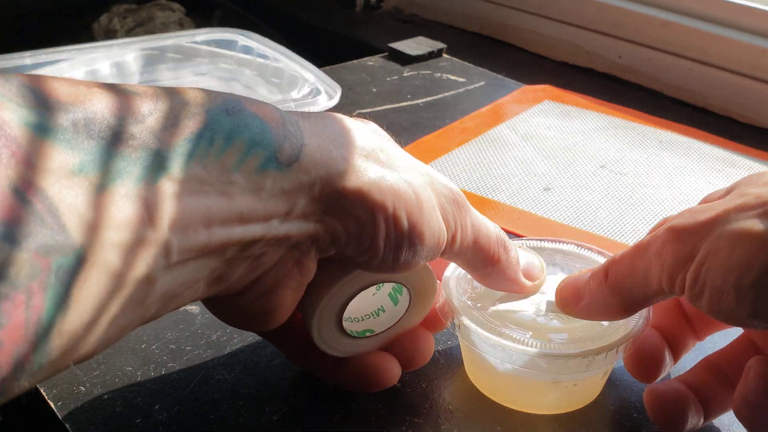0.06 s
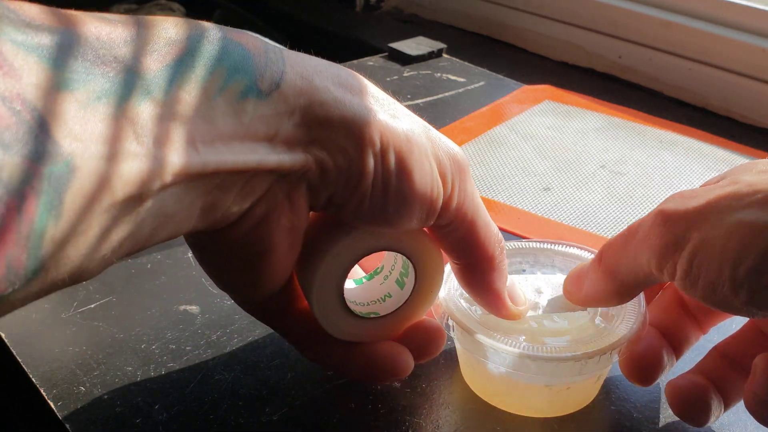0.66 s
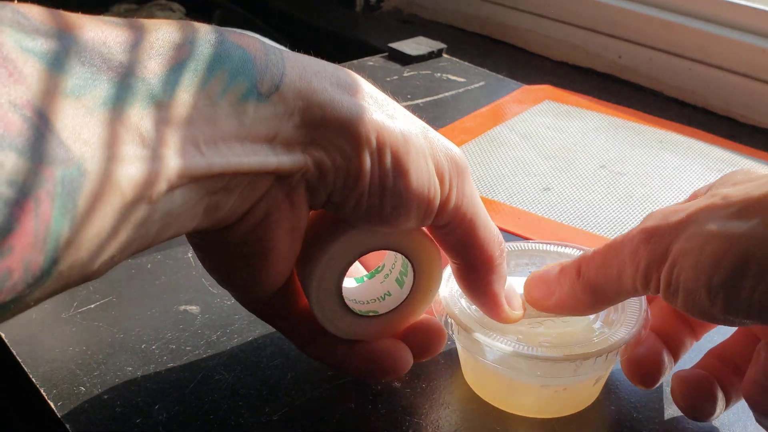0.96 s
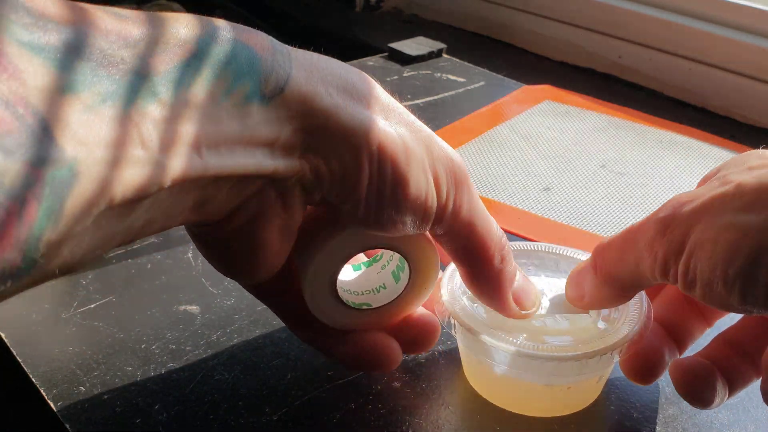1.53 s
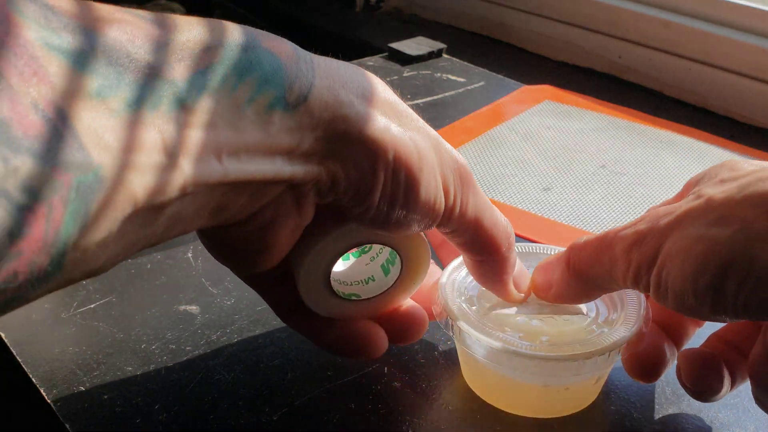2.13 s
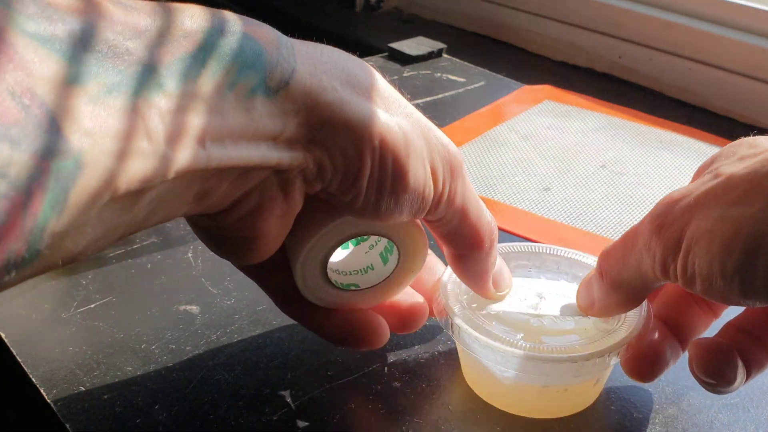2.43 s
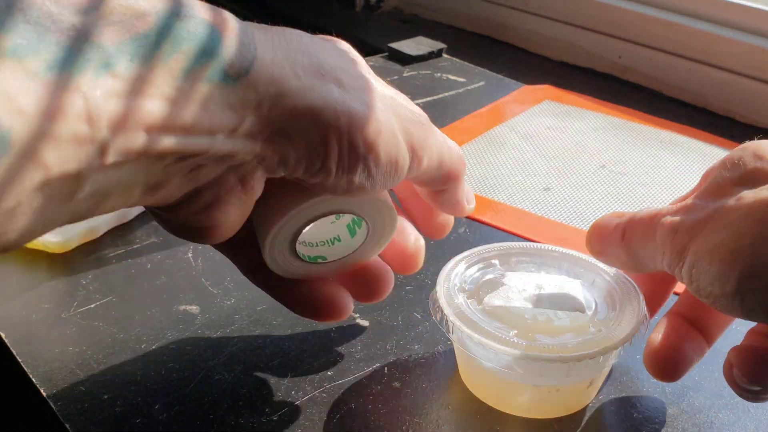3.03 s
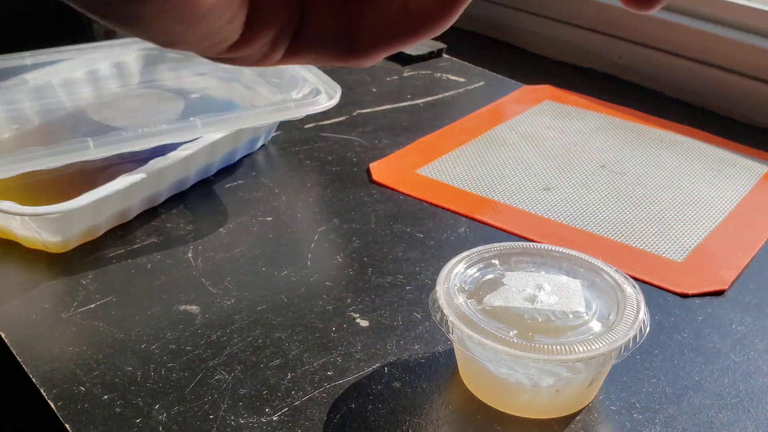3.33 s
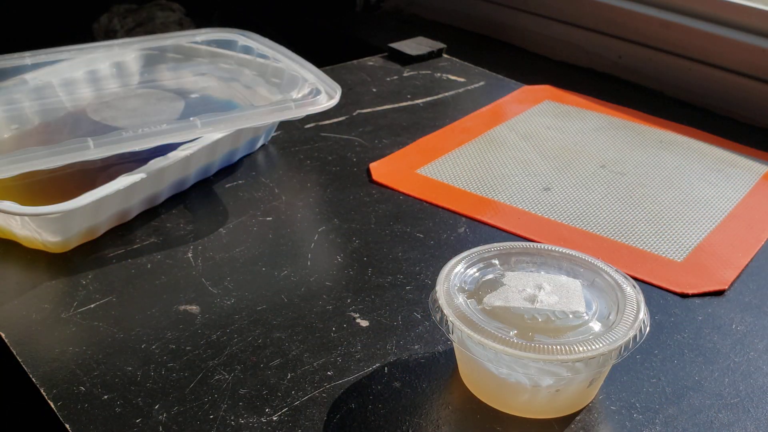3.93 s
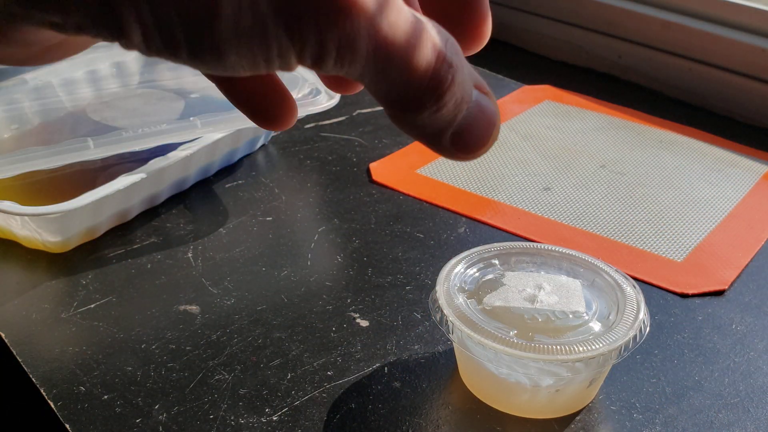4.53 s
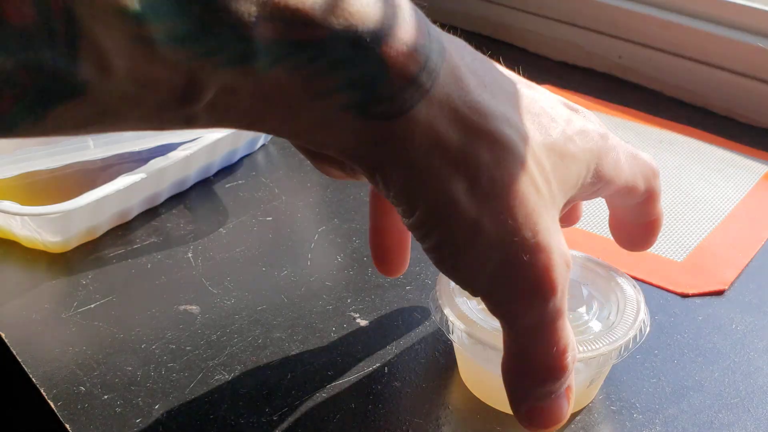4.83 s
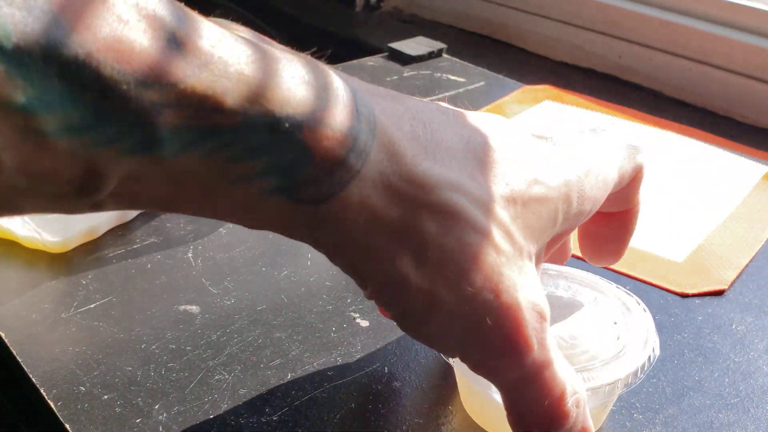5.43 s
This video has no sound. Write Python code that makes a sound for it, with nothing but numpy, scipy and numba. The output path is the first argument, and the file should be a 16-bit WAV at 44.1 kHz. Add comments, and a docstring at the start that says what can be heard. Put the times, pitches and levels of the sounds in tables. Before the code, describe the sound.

Fingers rub tape onto a thin plastic cup lid, which rings softly and buckles with a few sharp snaps, over a faint hum.

```python
"""Taping a cup's lid

Two fingers rub paper tape down onto the thin plastic lid of a small cup, close by in a small room.
The rubbing makes the lid ring. It buckles with sharp snaps and pops back twice when it is let go.
The hands draw back with a soft swish. After a dull knock one takes the cup, which ticks and creaks.
Mains hum and a faint hiss lie under it all."""
import sys
import numpy as np
from scipy import signal
from scipy.fft import rfft, irfft, next_fast_len
from scipy.io import wavfile
from scipy.ndimage import uniform_filter1d, minimum_filter1d
from numba import njit

SR = 44100
rng = np.random.default_rng(int(sys.argv[2]) if len(sys.argv) > 2 else 0)


def persist_wave(psi):
    """Save psi, clipped to +-1, as 16-bit WAV."""
    counts = np.round(np.clip(psi, -1, 1) * 32767).astype(np.int16)
    wavfile.write(sys.argv[1], SR, np.atleast_2d(counts).T)


N = 245637
TIME = np.arange(N) / SR
DOME_LEFT_DB = 6   # the dome is the lid's middle; "left dB" is how much louder the left side is
HANDS_OFF_S = 3.05   # the fingers leave the lid

# How loud the mains hum is over time: time_s, low_note_db, octave_db
HUM_LEVELS = [(0.0, -55.5, -53.5), (1.09, -56, -54), (1.39, -62, -57), (1.84, -61, -60), (2.45, -61, -59.5),
              (5.04, -63, -64), (5.57, -57.5, -58)]
# Finger strokes on the tape, later on the bare cup:
# start_s, length_s, drone_db, hiss_db, extra_rasp_db, dome_pitch_hz
STROKES = [(0.0, 0.064, -45, -47, 0, 1110), (0.073, 0.25, -49.5, -57, -6, 1115),
           (0.15, .14, -46, -49, 1, 1130), (0.271, 0.15, -53, -56.5, 0, 1100),
           (0.389, 0.06, -49, -58.5, -2, 1050), (0.492, .11, -47, -52, -2, 1130),
           (0.698, 0.062, -57, -62, -4.5, 1080), (0.766, 0.055, -49, -58.5, 0, 1150),
           (0.915, 0.2, -47.5, -61.5, -6, 1170), (1.045, 0.091, -38.5, -45.5, 0, 1140),
           (1.115, 0.13, -41.5, -50, 0.5, 1130), (1.211, 0.15, -48.5, -55.5, 0.5, 950),
           (1.429, 0.041, -54, -52, 0, 930), (1.449, 0.16, -56.5, -60.5, -1, 1050),
           (1.605, 0.092, -46.5, -53, 0.5, 1000), (1.716, 0.092, -55.5, -76, -11, 1090),
           (1.801, .11, -51, -57.5, -4.5, 1160), (1.9, 0.082, -61, -69.5, -6, 1100),
           (1.995, 0.029, -53, -62, -5, 1050), (2.072, 0.082, -47.5, -53, -1, 1140),
           (2.138, 0.066, -47.5, -60, -4, 1120), (2.196, 0.075, -43, -51.5, -3.5, 940),
           (2.291, 0.22, -50, -59.5, 0, 930), (2.527, 0.17, -55, -60.5, 1.5, 1030),
           (2.694, .05, -52.5, -69, -3, 1050), (2.736, 0.039, -43, -52, 0, 1000),
           (2.812, 0.076, -48, -55.5, 0, 1100), (2.881, .075, -42, -50.5, 0, 1040),
           (2.961, 0.053, -61, -86, -4, 1080), (5.082, .065, -69.5, -67.5, -3, 938),
           (5.151, 0.071, -73.5, -69.5, -2.5, 918), (5.319, 0.067, -68.5, -78, -4, 950),
           (5.402, 0.078, -68, -65.5, -5, 915), (5.503, 0.05, -54, -65, -2, 925)]
# A finger catches and the plastic ticks: start_s, level_db, sharpness_db
FINGER_CATCHES = [(0.695, -53.5, 6), (.750, -46.5, -13), (0.924, -45.5, -8), (1.606, -40, -17),
                  (2.062, -54, 7), (2.32, -44, -19), (5.108, -55.5, -2), (5.324, -58, 0.5),
                  (5.4532, -47, 10), (5.493, -54.5, 8), (5.531, -48.5, 12)]
# The lid buckles (the last three columns are added to level_db):
# start_s, level_db, dome_pitch_hz, ring_s, upper_notes_db, crack_db, snick_db
LID_SNAPS = [(1.1616, -16, 1213, 0.0022, -13.5, -25, -36), (1.3276, -1, 833, .0021, -2, 1.5, -43.5),
             (1.3400, -36, 880, 0.0022, 4.5, 1, -25.5), (1.3580, -37, 745, 0.0011, -2.5, 2, -22),
             (1.3650, -35, 755, 0.0059, -4, 2.5, -27.5), (1.7134, -10, 1087, 0.0026, -13.5, -16, -54),
             (2.9428, -23.5, 1070, 0.0031, -11, -17.5, -36.5),
             (3.0573, 4, 1063, 0.0025, -15.5, -13.5, -36.5), (3.0747, -3, 916, 0.0034, -19.5, -20.5, -31.5)]
# Dull knocks on the counter, first under the loud snaps, later on their own: start_s, thud_db, tick_db
KNOCKS = [(1.3285, -33, -69.5), (1.714, -49, -75), (3.076, -39, -70), (3.679, -85.5, -53.5),
          (4.361, -66.5, -56.5), (4.375, -76, -62), (4.42, -58, -70), (4.47, -47, -73),
          (4.4974, -44.5, -80)]

# The notes the plastic rings at (a fade is the time to fall 60 dB): pitch_hz, level_db, fade_s, left_db
LID_NOTES = [(1370, -1, 0.01034, 6), (1609, -2, 0.013, 12), (1884, -4.5, .012, 18.5),
             (2580, -13, 0.01537, 17.5), (2720, -3.5, .012, 5), (3135, -9.5, 0.01, 16.5),
             (3990, -8, 0.0082, 3), (5000, -18, .008, -0.5), (5317, -22.5, 0.015, -9)]   # the lid, above the dome's own note
CUP_NOTES = [(290, -5, 0.039, 6), (850, -2, 0.063, -9), (975, -5, .03, 1.5), (2870, -19, 0.024, 7),
             (4000, -1, 0.027, -5), (5630, 0, .02, -6), (6240, 0, 0.033, -18)]   # the cup's wall
# How the lid's sound leans to the left, low to high: pitch_hz, left_db
LID_BALANCE = [(150, -2), (400, 6.5), (800, 6.5), (1300, -2), (2200, 19), (3200, 5), (4400, 2.5),
               (6000, -6), (8000, 1.5), (11000, 8.5), (15000, 9)]

# Tone colours, or how strong each sound is from low to high: pitch_hz, level_db
WHIR_COLOUR = [(70, -8.5), (130, 3.5), (230, -6.5), (330, -2), (430, -8), (600, -25), (1000, -42.5)]   # low whir that swells with the hum
LEFT_HISS_COLOUR = [(25, -102), (45, -91), (90, -87.5), (200, -99.5), (350, -101), (550, -113),
                    (1000, -115), (1450, -111), (2000, -95), (2500, -94.5), (3000, -106), (3700, -124),
                    (8500, -134), (14000, -124)]   # left microphone's hiss
RIGHT_HISS_COLOUR = [(25, -105), (45, -96), (90, -89.5), (200, -95.5), (350, -108), (600, -120),
                     (2000, -125), (6000, -128), (8500, -135), (14000, -127)]   # right microphone's hiss
PAPER_COLOUR = [(150, -2), (330, -2.5), (500, -2.5), (900, -8), (1500, -4), (2200, -1), (3050, 3.5),
                (3900, -2.5), (5200, 1.5), (6300, 0.5), (7300, -9), (8500, -18.5), (15500, -32)]   # skin sliding on tape
RASP_COLOUR = [(3000, -37), (7000, -18), (8300, -14), (10300, 4), (15500, -1)]   # the high edge of that sliding
CRACK_COLOUR = [(150, -19), (400, -8), (700, 3), (1400, 0), (2200, -6.5), (2900, 1.5), (3500, -0.5),
                (4200, -1), (6100, 0.5), (7200, -13), (8500, -18), (11000, -22.5), (15500, -22)]   # plastic creasing
SNICK_COLOUR = [(3000, -20.5), (6000, 2), (8000, -4), (11000, 2), (15500, -1)]   # the thin sheet's high click
THUD_COLOUR = [(60, -1), (160, 9), (260, 4), (430, 5.5), (650, -1.5), (1100, -7.5), (2000, -18),
               (4000, -58.5)]   # dull part of a knock
TICK_COLOUR = [(500, -25.5), (1500, -2.5), (2800, 0.5), (4500, 2.5), (6300, -8.5), (8000, -27),
               (15000, -22.5)]   # bright part of a knock
SKIN_COLOUR = [(2500, -20), (4200, -3), (5200, 3.5), (6300, -4), (8000, -19.5), (10500, -9), (13000, -3),
               (15500, -0.5)]   # hands brushing
ECHO_COLOUR = [(100, -8.5), (300, 13.5), (550, 3.5), (1000, -6), (2000, -3.5), (5000, 3), (8000, -6),
               (15000, 0)]   # the room's echo


def from_db(db):
    """Turn decibels into a number to multiply by."""
    return 10 ** (np.asarray(db) / 20)


def unit_level(x):
    """Scale a sound to an average power of 1."""
    return x / np.sqrt(np.mean(x ** 2) + 1e-20)


def pan(left_db):
    """Left and right volumes, left_db apart."""
    return from_db(np.array([[.5], [-.5]]) * left_db)


def keep_band(x, kind, hz, order=2):
    """Keep what is below hz ("low"), above it ("high") or between two pitches ("band")."""
    return signal.sosfilt(signal.butter(order, hz, kind, fs=SR, output="sos"), x)


def colour(x, points, share=1):
    """Give a sound a tone colour; share scales the colour's decibels."""
    size = 2 * next_fast_len(x.shape[-1])
    hz, db = np.transpose(points)
    curve_db = np.interp(np.log(np.fft.rfftfreq(size, 1 / SR) + 1), np.log(hz), db)
    cepstrum = irfft(np.log(from_db(share * curve_db)))
    # folding this in half stops the filter from ringing before the sound starts
    cepstrum[1:size // 2] *= 2
    cepstrum[size // 2 + 1:] = 0
    return irfft(rfft(x, size) * np.exp(rfft(cepstrum)))[..., :x.shape[-1]]


def fade(fade_s):
    """A level that falls 60 dB in fade_s."""
    return np.exp(-np.log(1000) * TIME[:int(1.5 * fade_s * SR)] / fade_s)


def tone(hz, fade_s):
    """A pure note that dies away."""
    level = fade(fade_s)
    return level * np.sin(2 * np.pi * hz * TIME[:len(level)])


def burst(fade_s):
    """Stereo noise that dies away."""
    level = fade(fade_s)
    return level * rng.standard_normal((2, N))[:, :len(level)]


def drift(per_s):
    """Smooth random wavering, about 1 in size."""
    return unit_level(keep_band(rng.standard_normal(N), "low", per_s))


def add(out, start_s, sound):
    """Mix a sound in at start_s."""
    start = int(start_s * SR)
    part = sound[..., :N - start]
    out[..., start:start + part.shape[-1]] += part


def convolve(x, response):
    """Let every sample of x set off its own copy of the response."""
    return signal.fftconvolve(np.atleast_2d(x), np.atleast_2d(response), axes=-1)[:, :N]


def ringing(force, notes):
    """A force sets thin plastic ringing at its notes; a small sheet gives off little bass."""
    response = np.zeros((2, SR // 10))
    for k, (hz, db, fade_s, left_db) in enumerate(notes):
        add(response, 0, (-1) ** k * from_db(db) * pan(left_db) * tone(hz, fade_s))
    return convolve(force, keep_band(response, "high", notes[0][0] / 2))


def background(mains_hz=60, whir_db=-15):
    """Mains hum with its octave and a low whir, and the microphones' hiss, stronger on the left."""
    low_db, octave_db = (np.interp(TIME, np.transpose(HUM_LEVELS)[0], levels)
                         for levels in np.transpose(HUM_LEVELS)[1:])
    phase = 2 * np.pi * mains_hz * TIME
    hum = np.sqrt(2) * (from_db(low_db) * np.sin(phase) + from_db(octave_db) * np.cos(2 * phase))
    whir = from_db(octave_db + whir_db) * unit_level(colour(rng.standard_normal(N), WHIR_COLOUR))
    noise = rng.standard_normal((3, N)) * np.sqrt(SR / 2)
    shared = colour(noise[2], [(300, -5), (700, -12), (2000, -29)])   # long waves reach both sides alike
    left, right = shared + colour(noise[:2], [(100, -11.5), (300, -6), (700, -0.5)])
    hiss = np.array([colour(left, LEFT_HISS_COLOUR), colour(right, RIGHT_HISS_COLOUR)])
    return hum * pan(2.047) + whir * pan(6.2) + keep_band(hiss, "high", 40)


def drone_level(creep_db=-70.5, skew=0.84, roundness=.45, let_go_s=.006):
    """How hard skin shakes the dome: a flat arch for each stroke, over the creep of resting fingers."""
    power = from_db(creep_db) ** 2 * (TIME < HANDS_OFF_S) + 1e-18
    for start_s, length_s, db, *_ in STROKES:
        progress = (TIME[:int(length_s * SR)] / length_s) ** skew
        arch = (4 * progress * (1 - progress)) ** roundness
        add(power, start_s, (from_db(db) * arch) ** 2)
    linger = np.exp(-1 / (let_go_s * SR))
    return np.sqrt(signal.lfilter([1 - linger], [1, -linger], power))


def hiss_level(levels_db, creep_db=-75, peak_share=0.51, width_share=0.47, squareness=2.3):
    """The hiss follows the finger's speed: a swell for each stroke, over the creep of resting fingers."""
    power = from_db(creep_db) ** 2 * (TIME < HANDS_OFF_S) + 1e-18
    for (start_s, length_s, *_), db in zip(STROKES, levels_db):
        from_peak = np.abs(TIME - start_s - peak_share * length_s) / (width_share * length_s)
        near = from_peak < np.pi
        power[near] += (from_db(db) * np.exp(-from_peak[near] ** squareness)) ** 2
    return np.sqrt(power)


def dome_pitch(time_s):
    """The pressure of each stroke tunes the dome, which glides from one stroke to the next."""
    start_s, length_s, *_, hz = np.transpose(STROKES)
    return np.interp(time_s, start_s + length_s / 2, hz)


def slips(per_s, spread_db):
    """Skin sticks and slips, giving tiny kicks at random times."""
    sizes = from_db(spread_db * np.minimum(rng.exponential(1, N), 4)) * rng.choice([-1, 1], N)
    return unit_level(sizes * (rng.random(N) < per_s / SR))


@njit
def gliding_ring(x, pitch_hz, width_hz):
    """Ring at one moving pitch; a smaller width rings longer."""
    turn = 2 * np.pi * pitch_hz / SR
    linger = np.exp(-np.pi * width_hz / SR)
    y = np.zeros(len(x))
    for i in range(2, len(x)):
        y[i] = x[i] - x[i - 2] + 2 * linger * np.cos(turn[i]) * y[i - 1] - linger * linger * y[i - 2]
    return y


def from_lid(x):
    """The lid sends some pitches more to the left and others more to the right."""
    return np.array([colour(x[0], LID_BALANCE, 0.57), colour(x[1], LID_BALANCE, -0.34)])


def rubbing(dome_db=-4.5, upper_db=-7, rasp_db=-6, wander_share=.05, hiss_share=.35, grit_db=1.3):
    """Skin slips on paper fibres: the slips hiss, and shake the dome and the lid's upper notes."""
    *_, hiss_db, extra_rasp_db, _ = np.transpose(STROKES)
    drone, hiss, rasp = drone_level(), hiss_level(hiss_db), hiss_level(hiss_db + extra_rasp_db)
    dome_hz = dome_pitch(TIME) * (1 + wander_share * drift(per_s=26))   # the finger pressure wavers
    dome = gliding_ring(slips(per_s=6000, spread_db=0), dome_hz, width_hz=165)
    dome = keep_band(dome, "band", [680, 1600])
    fibres = from_lid(np.array([slips(per_s=14000, spread_db=2.5) for side in range(2)]))
    fibres *= from_db(grit_db * drift(per_s=120))
    upper_notes = ringing(slips(per_s=6300, spread_db=2), LID_NOTES[1:])
    upper_level = drone * (hiss / drone) ** hiss_share   # partway between drone and hiss
    return (from_db(dome_db) * drone * unit_level(dome) * pan(DOME_LEFT_DB)
            + from_db(upper_db) * upper_level * unit_level(upper_notes)
            + hiss * unit_level(colour(fibres, PAPER_COLOUR))
            + from_db(rasp_db) * rasp * unit_level(colour(fibres, RASP_COLOUR)))


def tick_rows(ring_s=0.0058):
    """Each catch is a tiny buckle at the dome's pitch, laid out like LID_SNAPS; sharper is brighter."""
    return [(start_s, db, dome_pitch(start_s), ring_s, -5 + 0.2 * sharp_db, sharp_db,
             -21 + 0.63 * sharp_db) for start_s, db, sharp_db in FINGER_CATCHES]


def buckles(rows, rise_s=0.00031, dome_boost_db=2, crack_cut_db=3):
    """The dome flips and swings until the fingers stop it; the crease cracks and rings the lid."""
    dome, kicks, cracks, snicks = np.zeros(N), np.zeros(N), np.zeros((2, N)), np.zeros((2, N))
    t = TIME[:SR // 20]
    for start_s, db, hz, ring_s, upper_db, crack_db, snick_db in rows:
        swing = (1 - np.exp(-(t / rise_s) ** 2)) * np.exp(-(t / ring_s) ** 2)
        add(dome, start_s, -from_db(db + dome_boost_db) * swing * np.sin(2 * np.pi * hz * t))
        add(kicks, start_s, from_db([db + upper_db]))
        add(cracks, start_s, from_db(db + crack_db - crack_cut_db) * burst(fade_s=0.015))
        add(snicks, start_s, from_db(db + snick_db) * burst(fade_s=0.032))
    crackle = from_lid(colour(cracks, CRACK_COLOUR) + colour(snicks, SNICK_COLOUR))
    return keep_band(dome, "high", 520) * pan(DOME_LEFT_DB) + ringing(kicks, LID_NOTES) + crackle


def knocks(ring_db=-5, rattle_db=9):
    """Soft bumps on the counter, each with a low ring, a dull rattle and a small tick."""
    rings, rattles, ticks = np.zeros(N), np.zeros(N), np.zeros((2, N))
    for start_s, thud_db, tick_db in KNOCKS:
        add(rings, start_s, from_db(thud_db + ring_db) * tone(hz=393, fade_s=0.0094))
        add(rattles, start_s, from_db(thud_db + rattle_db) * burst(fade_s=0.09)[0])
        add(ticks, start_s, from_db(tick_db) * burst(fade_s=0.14))
    return (rings + colour(rattles, THUD_COLOUR) + colour(ticks, TICK_COLOUR)) * pan(left_db=7.46)


def hand_swish(peak_s=3.54, peak_db=-68, rise_db_per_s=85, fall_db_per_s=70):
    """A soft swish of skin swells and fades as the hands draw back."""
    drop_db = np.maximum(rise_db_per_s * (peak_s - TIME), fall_db_per_s * (TIME - peak_s))
    level = from_db(peak_db - drop_db + drift(per_s=19.8))
    return level * unit_level(colour(rng.standard_normal((2, N)), SKIN_COLOUR)) * pan(left_db=3)


def creak(start_s=5.514, length_s=.026, ramp_s=0.0038, level_db=-45, sag_db_per_s=60, slip_hz=925):
    """The gripped rim slips against the cup in quick, scratchy jerks, about one per swing of its wall."""
    t = TIME - start_s
    ramp = np.clip(np.minimum(t, length_s - t) / ramp_s, 0, 1)
    force = ramp * from_db(level_db - sag_db_per_s * np.maximum(t, 0))
    jerk_count = np.floor(np.cumsum(slip_hz * (1 + .05 * drift(per_s=300))) / SR)
    jerks = np.diff(jerk_count, prepend=0) * (1 + .5 * rng.standard_normal(N))   # uneven in size
    wall = ringing(keep_band(jerks, "low", 4000, order=1), CUP_NOTES)
    scratch = colour(jerks * rng.standard_normal((2, N)), PAPER_COLOUR)
    return force * (unit_level(wall) + from_db(-14) * unit_level(scratch))


def room(x, near_s=.0025, near_db=-15, walls_s=0.011, walls_db=-14, treble_hz=2188):
    """Hands and counter bounce the sound back at once; the walls answer later, the treble dying first."""
    near, walls = burst(fade_s=.06), np.zeros((2, N))
    add(walls, 0, keep_band(burst(fade_s=0.29), "low", treble_hz))
    add(walls, 0, keep_band(burst(fade_s=.24), "high", treble_hz))
    echo = np.zeros((2, SR))
    add(echo, near_s, from_db(near_db) * near / np.linalg.norm(near[0]))
    add(echo, walls_s, from_db(walls_db) * walls[:, :SR // 2] / np.linalg.norm(walls[0]))
    middle, side = colour(echo, ECHO_COLOUR) / np.sqrt(2)
    side = keep_band(side, "high", 600)   # low echoes reach both microphones alike
    blended = .75 * x + .25 * x[::-1]   # echoes come from all sides
    return x + convolve(blended, np.array([middle + side, middle - side]))


def scene():
    """The cup, the knocks and the hands in the room, over the hum and hiss."""
    left, right = rubbing() + buckles(LID_SNAPS + tick_rows()) + creak()
    left = np.concatenate([np.zeros(3), left[:-3]])   # the cup is a little nearer the right microphone
    return room(np.array([left, right]) + knocks() + hand_swish()) + background()


def record(dry, ceiling=.98, smooth_samples=161, cutoff_hz=15900):
    """Turn the loudest peaks down for a moment and cut off the highest treble."""
    needed = np.minimum(1, ceiling / (np.abs(dry).max(axis=0) + 1e-9))
    gain = uniform_filter1d(minimum_filter1d(needed, size=smooth_samples), size=smooth_samples)
    return signal.sosfilt(signal.ellip(10, .1, 80, cutoff_hz, fs=SR, output="sos"), gain * dry)


dry = scene()
out = record(dry)
persist_wave(out)
```